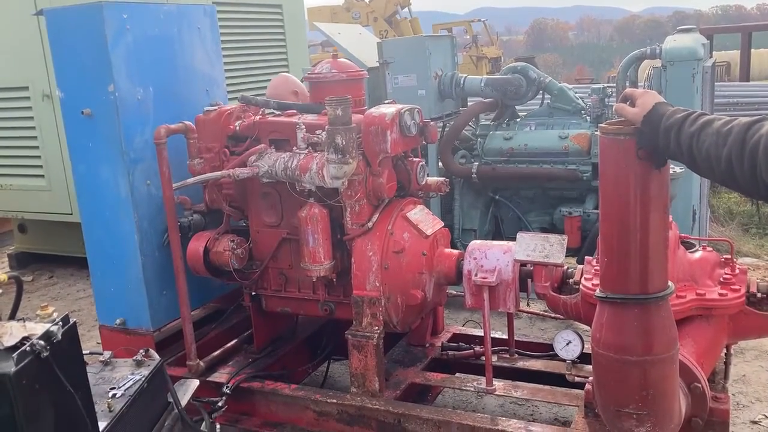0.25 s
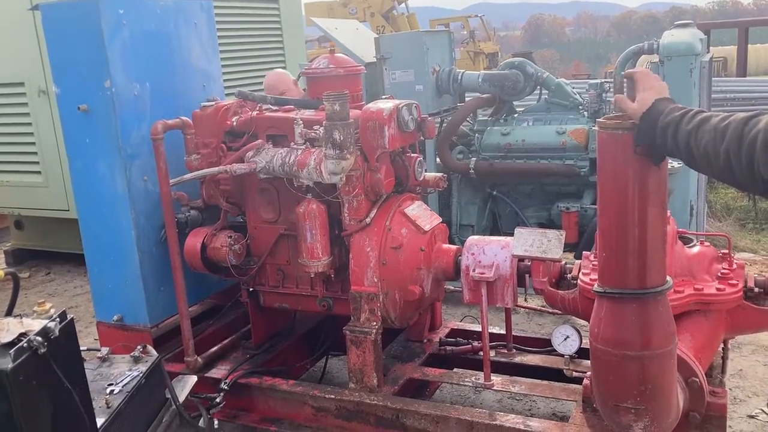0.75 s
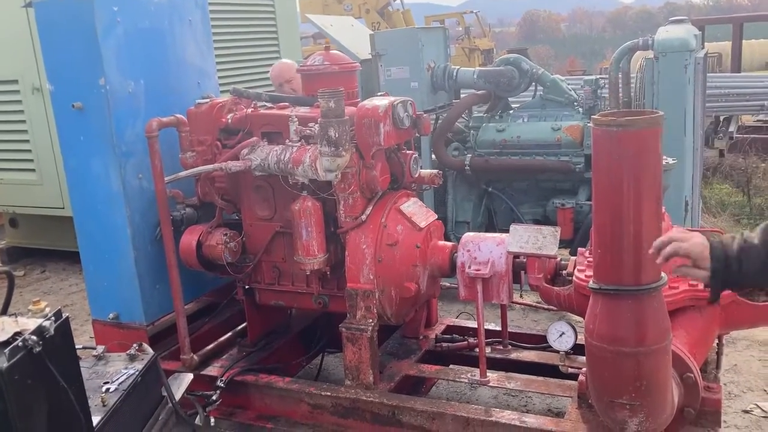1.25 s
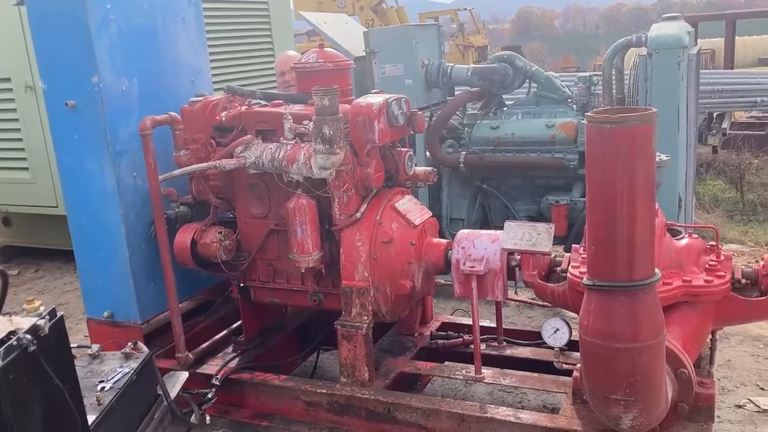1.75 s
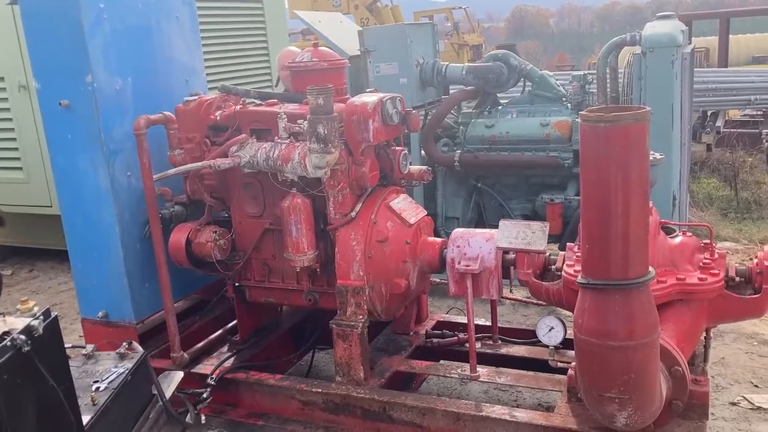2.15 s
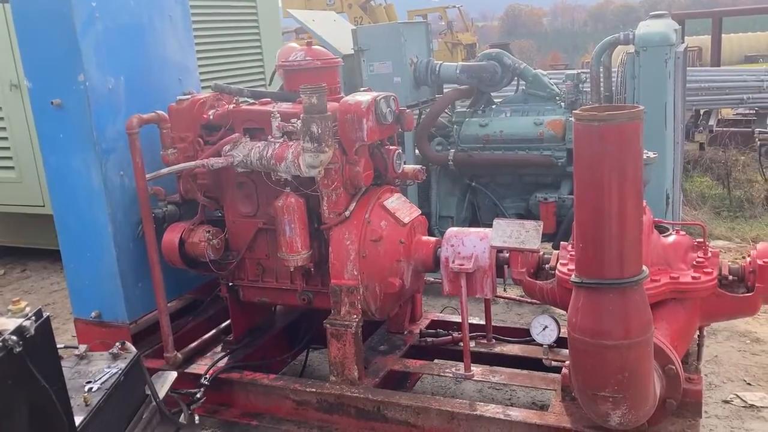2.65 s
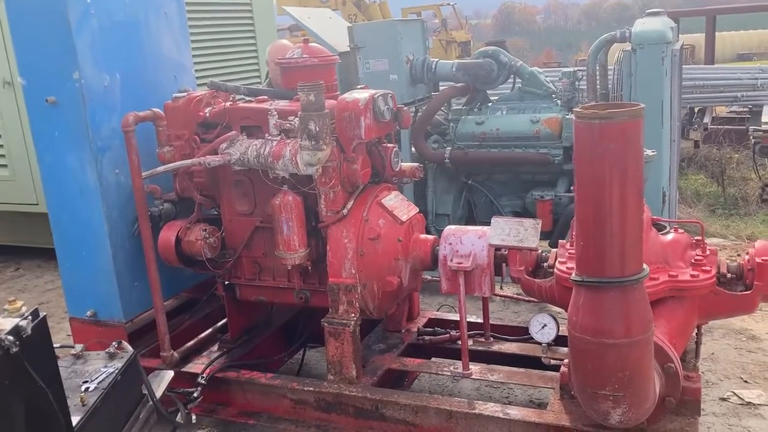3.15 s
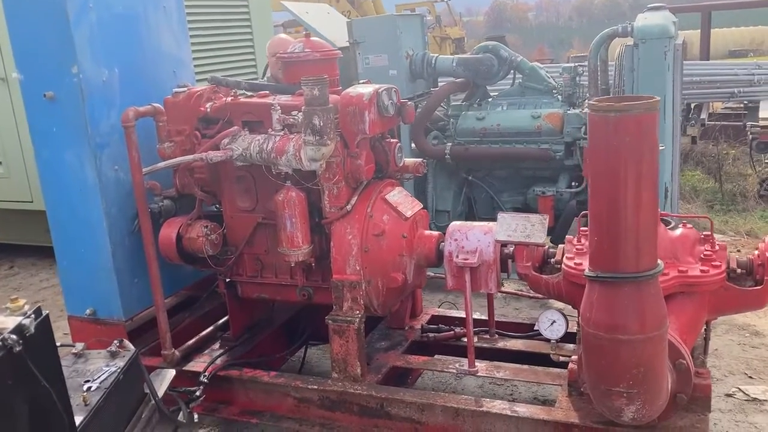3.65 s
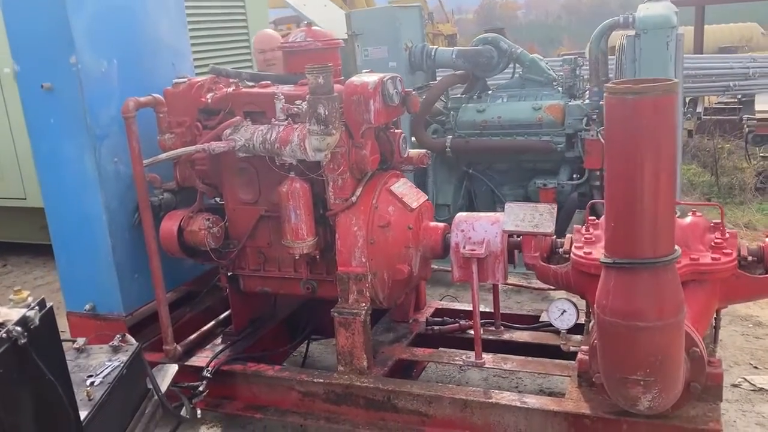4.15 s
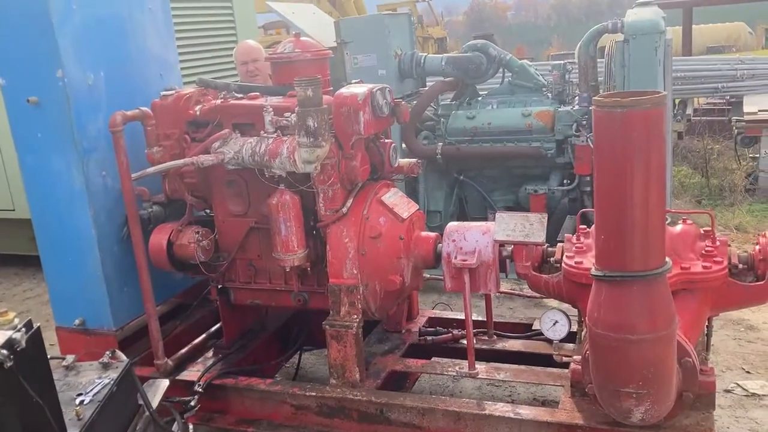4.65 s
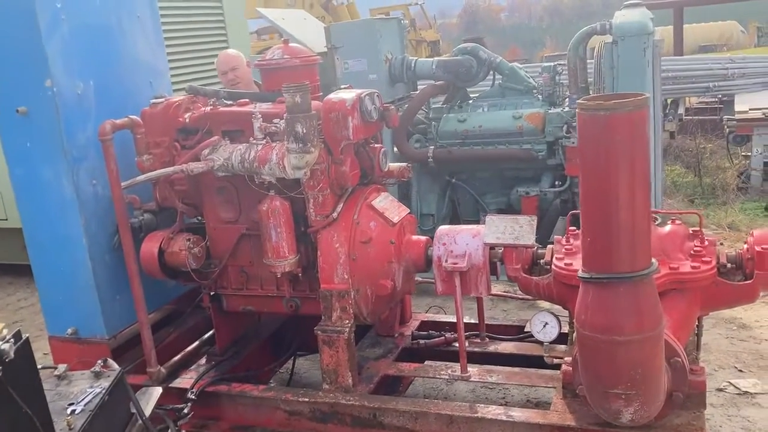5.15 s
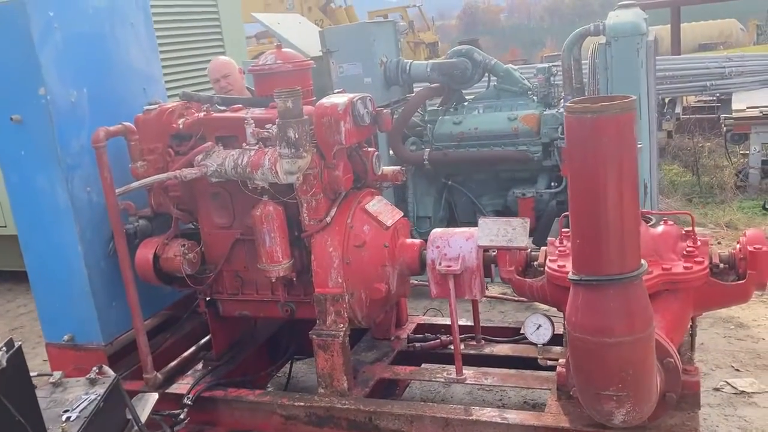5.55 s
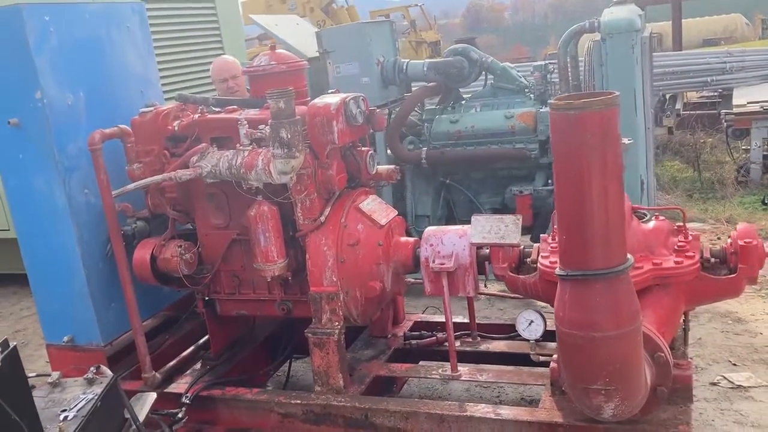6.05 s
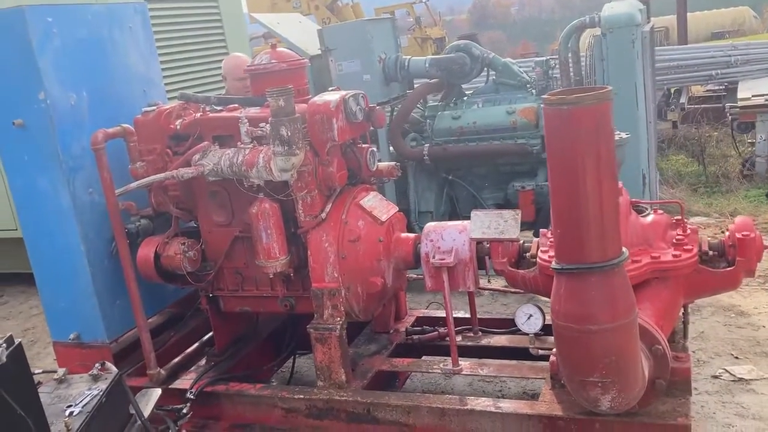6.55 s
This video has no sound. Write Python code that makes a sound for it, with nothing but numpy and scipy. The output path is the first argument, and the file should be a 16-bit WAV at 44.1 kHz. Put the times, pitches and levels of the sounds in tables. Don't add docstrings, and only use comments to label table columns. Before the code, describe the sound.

A rough two-stroke diesel engine revs up in an open yard, coasts down softer, then is revved twice more, higher, hissing and knocking.

```python
import sys
import numpy as np
from scipy import signal
from scipy.fft import rfft, irfft, next_fast_len
from scipy.io import wavfile
from scipy.ndimage import uniform_filter1d

SR = 44100
rng = np.random.default_rng(int(sys.argv[2]) if len(sys.argv) > 2 else 0)


def voltage_ratio(decibels):
    exponent = np.asarray(decibels, float) / 20
    return 10 ** exponent


def wrap_up_sound(samples):
    columns = np.atleast_2d(samples).T
    tamed = np.clip(columns, -1, 1)
    steps = np.round(tamed * 32767).astype(np.int16)
    wavfile.write(sys.argv[1], SR, steps)


N = 300321
SKIP_S, SKIP_TURNS = 6.265, 0.1

# (f/Hz, width/Hz, gain/dB)
BODY_MODES = [(256.7, 110, 12), (303.3, 51, -13.5), (343, 364, 5), (445, 29, 2.5), (592.7, 67, -16),
              (630, 346, 9), (744, 30, -12), (870, 27, -2), (1104.4, 131, 10.5), (1238, 57, -8),
              (1368, 178, 10), (1642, 61, 4.5), (1847, 53, 11), (2180, 53, 8), (2340, 23, 8),
              (2566, 56, 8.5), (2719, 31, 10.5), (3720, 280, 2), (1503, 57, 5.5)]
# (shaft angle/turn, crack on full fuel/dB, knock/dB)
CYLINDER_FIRINGS = [
    (-.015, 0.1, -4),
    (.295, -8, 1.5),
    (.645, -7, -3),
]


def rms_one(x):
    return x / np.sqrt(np.mean(x ** 2) + 1e-20)


def evened(x):
    return x / np.sqrt(uniform_filter1d(np.mean(x ** 2, axis=0), size=8000) + 1e-12)


def in_time(rows):
    t_s, *columns = np.transpose(rows)
    return [np.interp(np.arange(N) / SR, t_s, column) for column in columns]


def at_hz(points, hz):
    points_hz, values = np.array(points)[:, 0], np.array(points)[:, 1]
    return np.interp(np.log(hz), np.log(points_hz), values)


def drift(rate_hz):
    r = np.exp(-80 * np.pi * rate_hz / SR)
    white = rng.standard_normal(N // 40 + 2002)
    slow = signal.lfilter([1], [1, -2 * r, r * r], white)[2000:]
    return np.interp(np.arange(N) / 40, np.arange(len(slow)), rms_one(slow))


def late(x, samples):
    size = next_fast_len(N + 64)
    turn = np.exp(-2j * np.pi * samples * np.arange(size // 2 + 1) / size)
    return irfft(rfft(x, size) * turn, size)[:N]


def band_pass(x, low_hz, high_hz):
    return signal.sosfilt(signal.butter(2, [low_hz, high_hz], "band", fs=SR, output="sos"), x)


def tones(turns, orders, levels_db, sweep, wander_db, apart):
    out = np.zeros((2, N))
    for order, db in zip(orders, levels_db):
        jitter = 0.3 * rng.standard_normal() + 0.012 * order * drift(3.1)
        phase = 2 * np.pi * order * turns + sweep * order ** 2 + jitter
        skew = apart * order * (rng.standard_normal() + 0.52 * drift(0.23))
        out += voltage_ratio(db + wander_db * drift(1.72)) * np.cos(phase + skew * [[1], [-1]])
    return out


def firings(turns, speed, levels_db, decay_s, uneven_db):
    out = np.zeros(N)
    chance = rng.standard_normal((int(turns.max()) + 3, len(CYLINDER_FIRINGS)))
    for k, db in enumerate(levels_db):
        whole, part = np.divmod(turns - CYLINDER_FIRINGS[k][0] + 1, 1)
        strength = voltage_ratio(db + uneven_db * chance[whole.astype(int), k])
        out += strength * np.exp(-part / speed / decay_s)
    return out


def body(x, rows=BODY_MODES):
    for hz, width_hz, db in rows:
        a, w = voltage_ratio(db / 2), 2 * np.pi * hz / SR
        q = np.pi * width_hz / SR
        zeros = [1 + q * a, -2 * np.cos(w), 1 - q * a]
        poles = [1 + q / a, -2 * np.cos(w), 1 - q / a]
        x = signal.lfilter(zeros, poles, x)
    return x


def coloured(spectrum, likeness, patchy_db):
    out, white = 0, rng.standard_normal((2, 2, N))
    bottom_hz, top_hz = spectrum[0][0], spectrum[-1][0]
    edges_hz = np.geomspace(bottom_hz, top_hz, int(2.5 * np.log2(top_hz / bottom_hz)) + 2)
    for k, (low_hz, high_hz) in enumerate(zip(edges_hz, edges_hz[1:])):
        mid, side = band_pass(white[k % 2], low_hz, high_hz)
        hz = np.sqrt(low_hz * high_hz)
        alike = np.clip(at_hz(likeness, hz), 0, 1)
        gain = voltage_ratio(at_hz(spectrum, hz) + patchy_db * drift(35.0))
        out = out + gain * (np.sqrt(1 + alike) * mid + np.sqrt(1 - alike) * side * [[1], [-1]])
    return out


def loudness_db(fuel, speed, idle_db, gain_db, curve, db_per_turn):
    return idle_db + gain_db * fuel ** curve + db_per_turn * (speed - 35)


def exhaust(turns, speed, fuel, rows):
    fast = np.clip((speed - 36) / 12, 0, 1)
    levels_db = [coast + fuel * (full - coast) + fast * top for _, coast, full, top in rows]
    orders = [round(row[0]) for row in rows]
    rough = voltage_ratio(1.1 * fuel * drift(45))
    lines = tones(turns, orders, levels_db, sweep=1.62, wander_db=1.5, apart=0.019)
    return evened(body(rough * lines))


def block(turns, speed, fuel):
    # (f/Hz, level/dB per Hz)
    rattle_db = [(60, -37), (110, -34), (250, -26.5), (600, -1.5), (1200, -10), (2000, -12), (3500, -11.5),
                 (5000, -14), (6500, -24)]
    # (f/Hz, likeness 0-1)
    rattle_likeness = [(60, 0.33), (300, 1), (640, 0.99), (1200, 0.61), (2000, 0.97), (4000, 0.46),
                       (6000, 0.61)]
    orders = np.arange(22, 80)
    levels_db = -8.5 * np.log2(orders / 22) + 2.0 * (orders % 3 == 0)
    levels_db = levels_db + 0.38 * rng.standard_normal(len(orders))
    lines = rms_one(tones(turns, orders, levels_db, sweep=0.11, wander_db=3.1, apart=0.016))
    blur = voltage_ratio(1.45 * fuel - 0.24 * (speed - 24.0) + 0.64 * drift(25))
    knocks_db = [row[2] for row in CYLINDER_FIRINGS]
    puffs = firings(turns, speed, knocks_db, decay_s=0.00024, uneven_db=1.5)
    knock = -rms_one(band_pass(puffs, 500, 4800))
    rattle = rms_one(coloured(rattle_db, rattle_likeness, patchy_db=1.52))
    return evened(body(blur * lines + voltage_ratio(-11.5 + 8.9 * fuel) * knock + voltage_ratio(-0.5) * rattle))


def cracks(turns, speed, fuel):
    # (f/Hz, level/dB per Hz)
    hiss_db = [(5000, -11.5), (6500, -2), (7600, 0.5), (8400, 11), (10000, -3.5), (13000, -1.5),
               (15500, -8), (17500, -12)]
    levels_db = [row[1] * np.sqrt(fuel) for row in CYLINDER_FIRINGS]
    gate = firings(turns, speed, levels_db, decay_s=0.0014, uneven_db=2.0)
    gate = (0.13 + 2.95 * fuel) * gate
    hiss = coloured(hiss_db, [(5000, 0.16), (8400, 1.0), (15000, 0.96)], patchy_db=1.1)
    r, w = np.exp(-np.pi * 1300 / SR), 2 * np.pi * 8300 / SR
    b = (1 - r * r) / 2
    ringing = signal.lfilter([b, 0, -b], [1, -2 * r * np.cos(w), r * r], gate * hiss)
    snap = band_pass(np.maximum(np.diff(gate, prepend=0), 0), 7000, 15000)
    left, right = evened(hiss + gate * hiss + 2.15 * ringing + 5.5 * np.std(hiss) * snap)
    return np.array([-late(left, 9.6), right])


def blower(turns, speed):
    # (multiple of shaft rate, level at top speed/dB)
    blower_lines = [(8.7, -49), (9.7, -32.5), (10.3, -41), (11.7, -35), (12.7, -43), (13.7, -38),
                    (14.3, -46), (22.4, -45)]
    multiples, levels_db = np.transpose(blower_lines)
    multiples = np.round(multiples * 10) / 10
    lines = tones(turns, multiples, levels_db, sweep=0.97, wander_db=4.0, apart=0.015)
    return voltage_ratio(0.68 * np.minimum(speed - 45.0, 0)) * lines


def wind():
    # (t/s, level/dB)
    wind_db = [
        (0, -54),
        (.6, -62),
        (1.2, -78),
        (3, -70),
        (3.8, -76),
        (4.2, -67.5),
        (5.3, -72),
        (6, -53),
        (6.8, -62),
    ]
    common, own = band_pass(rng.standard_normal((2, N)), 28, 65)
    pop = voltage_ratio(-24) * np.exp(-((np.arange(N) / SR - SKIP_S) / 0.0018) ** 2)
    gust = voltage_ratio(in_time(wind_db)[0] + 2.5 * drift(5.5))
    return gust * rms_one(common + 0.16 * own * [[1], [-1]]) + pop


def scene():
    # (t/s, speed/turns per s)
    shaft_speed = [(0.0, 24.25), (0.85, 35.2), (0.97, 35.5), (1.55, 35.5), (1.86, 35.14), (2.24, 34.33),
                   (3.45, 32.45), (3.57, 32.96), (3.72, 34.12), (3.96, 37.16), (4.12, 38.17), (4.34, 39.0),
                   (4.74, 42.9), (5.18, 44.85), (5.76, 48.17), (5.95, 48.65), (6.5, 46.11), (6.81, 45.0)]
    # (t/s, fuel 0-1)
    fuel_rack = [(0, 1), (.84, 0.94), (1.04, 0), (1.2, 0.4), (2.0, 0.2), (3.33, 0.2), (3.56, 0.47),
                 (3.68, 1.01), (3.97, 1.03), (4.11, 0.48), (4.33, 0.59), (4.48, 0.97), (4.71, 0.9),
                 (4.92, .65), (5.35, 0.84), (5.85, 0.76), (5.98, 0.4), (6.81, 0.19)]
    # (multiple of shaft rate, coasting/dB, full fuel/dB, added at top speed/dB)
    exhaust_orders = [(1.08, -61, -67, 15), (1.955, -14, -24.5, 14), (2.994, 3, 1.5, 3.7),
                      (4.05, -3, -16.5, 6), (5.013, -1.5, -8.5, 4), (5.986, 1, 2, -6.5), (6.92, 0, -5, 7),
                      (7.96, 6.5, -3, 1), (9.026, -7, -1.5, 4.5), (9.95, -4.5, -1, -3), (11.014, 0, -3, 4),
                      (12.064, -4, -6, 1), (13.05, -13, -7.5, 13), (14.03, -13, -10, 7.5),
                      (15, -17.5, -3.5, -5.5), (15.88, -44, -9, 15), (17, -12, -6, 2),
                      (17.9, -0.5, -3.5, -15), (19, -10, -14, 6), (20, -22.5, -4.5, -5),
                      (20.94, -5.5, -5.5, -4.5)]
    # (f/Hz, width/Hz, gain/dB)
    stack_modes = [(99.3, 7.3, 5.5), (318, 15, -7), (343, 16, 3.5), (374.5, 7.3, 4), (473, 53, 4),
                   (531, 35, -6.5)]
    speed, = in_time(shaft_speed)
    rack = np.maximum(in_time(fuel_rack)[0], 0)
    fuel = np.minimum(rack, 1)
    turns = np.cumsum(speed) / SR + SKIP_TURNS * (np.arange(N) > SKIP_S * SR)

    boom_db = loudness_db(rack, speed, idle_db=-22.5, gain_db=7.5, curve=0.8, db_per_turn=-0.23)
    bark_db = loudness_db(rack, speed, idle_db=-29.5, gain_db=14, curve=1.1, db_per_turn=0.08)
    block_db = loudness_db(rack, speed, idle_db=-31.0, gain_db=10, curve=1.5, db_per_turn=-0.2249)
    crack_db = -51 + 18 * rack

    boom = voltage_ratio(boom_db) * exhaust(turns, speed, fuel, exhaust_orders[:8]) * voltage_ratio([[0.4], [-0.4]])
    bark = voltage_ratio(bark_db) * exhaust(turns, speed, fuel, exhaust_orders[8:]) * voltage_ratio([[0.2], [-0.2]])
    castings = voltage_ratio(block_db + 3.0) * block(turns, speed, fuel) * voltage_ratio([[1.1], [-0.9]])
    left, right = body(boom + bark, stack_modes) + blower(turns, speed) + castings
    engine = np.array([left, late(right, 3.87)])
    return engine + voltage_ratio(crack_db + 4.5) * cracks(turns, speed, fuel) + wind()


def drop_weak_bands(x):
    # (0 sum or 1 difference, low f/Hz, high f/Hz, threshold level/dB)
    weak_bands = [(0, 8800, 9600, -57), (0, 13150, 14450, -57), (0, 5350, 5700, -62), (0, 8500, 8800, -66),
                  (0, 12700, 13150, -66), (0, 14450, 14900, -67), (0, 5000, 5350, -63),
                  (1, 7200, 7500, -64), (1, 11700, 12100, -66), (1, 6600, 7200, -58),
                  (1, 11000, 11700, -57), (1, 15200, 15900, -58)]
    pair = np.array([x[0] + x[1], x[0] - x[1]]) / 2
    hz = np.arange(N // 2 + 1) * SR / N
    for which, low_hz, high_hz, db in weak_bands:
        which = int(which)
        band = irfft(rfft(pair[which]) * (hz > low_hz) * (hz < high_hz), N)
        faint = uniform_filter1d(band ** 2, size=1024)[512::1024] < voltage_ratio(db) ** 2
        mute = np.resize(np.repeat(faint * 1.0, 1024), N)
        pair[which] -= band * uniform_filter1d(mute, size=256)
    return np.array([pair[0] + pair[1], pair[0] - pair[1]])


def low_pass(x):
    return signal.sosfilt(signal.butter(12, 17140, fs=SR, output="sos"), x)


def record(dry):
    x = 1.15 * np.tanh(dry / 1.15)
    x = signal.sosfilt(signal.ellip(10, 0.5, 45, 15800, fs=SR, output="sos"), x)
    x = signal.sosfilt(signal.butter(2, 40, "high", fs=SR, output="sos"), x)
    return low_pass(drop_weak_bands(x))


dry = scene()
out = record(dry)
wrap_up_sound(out)
```